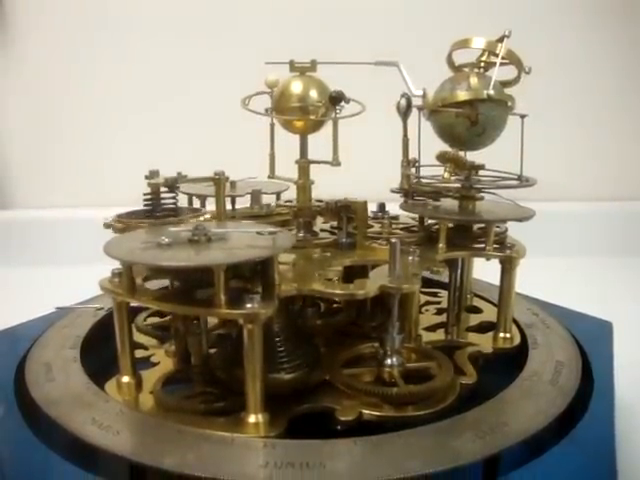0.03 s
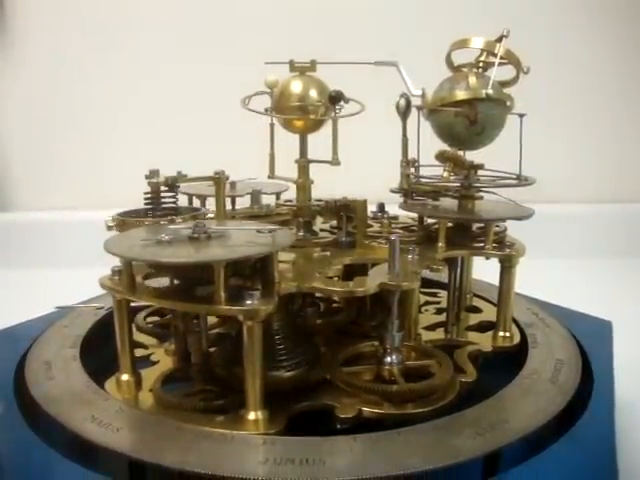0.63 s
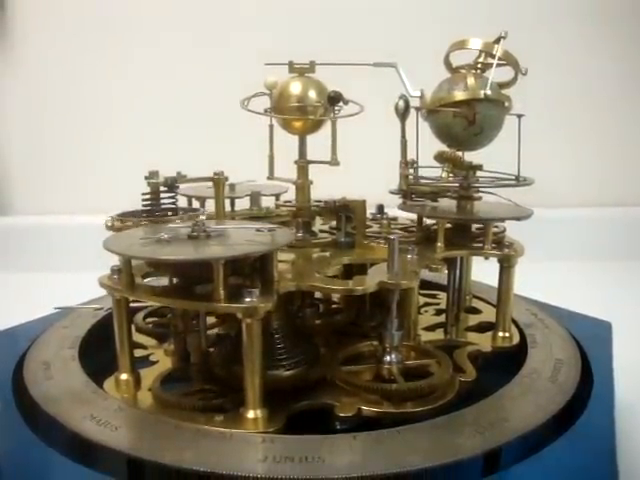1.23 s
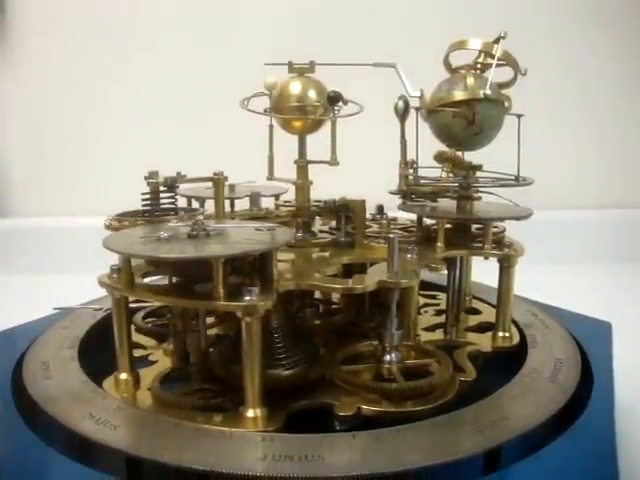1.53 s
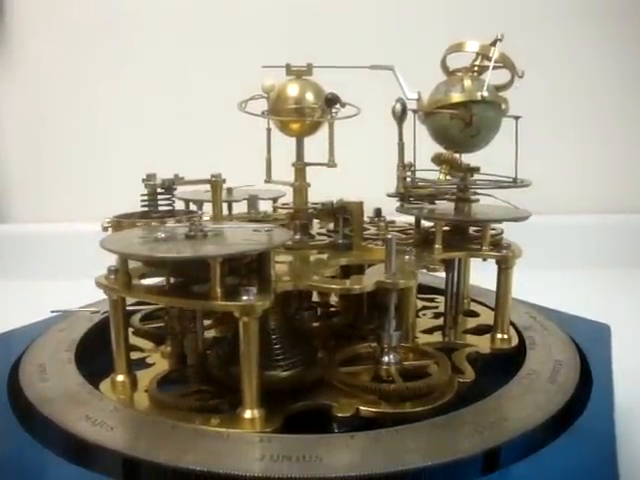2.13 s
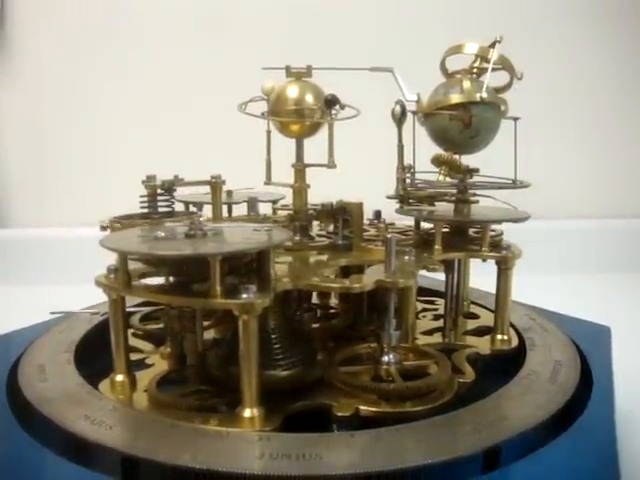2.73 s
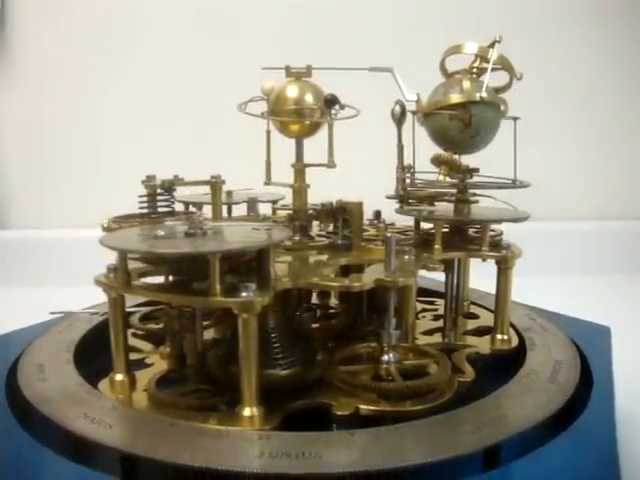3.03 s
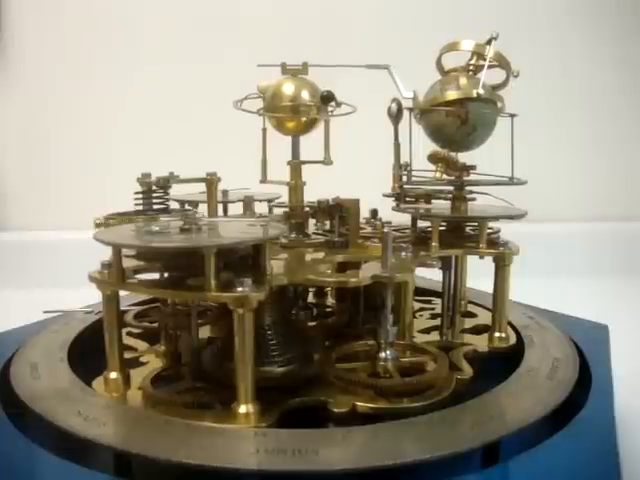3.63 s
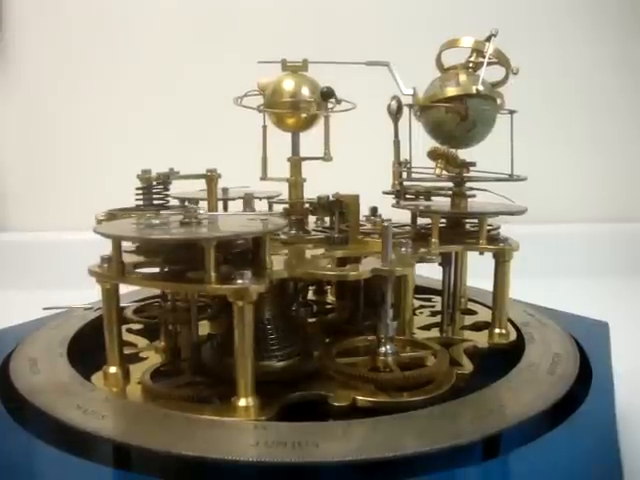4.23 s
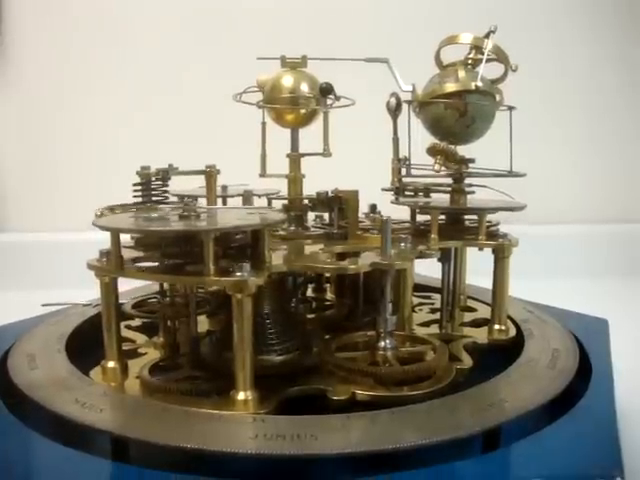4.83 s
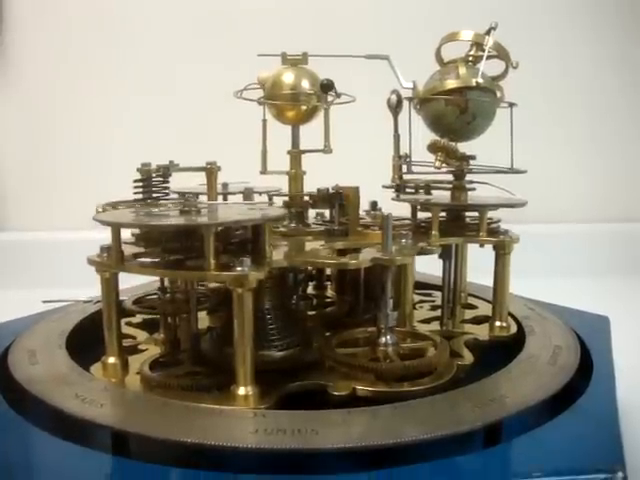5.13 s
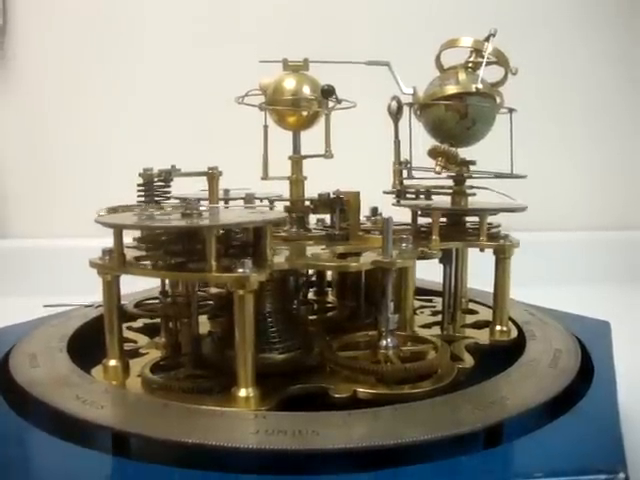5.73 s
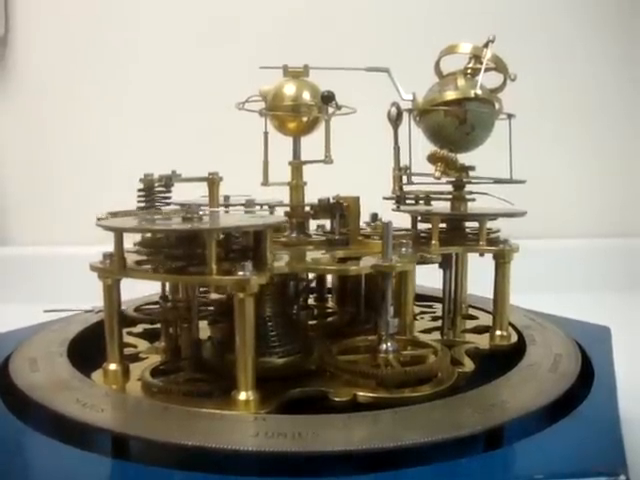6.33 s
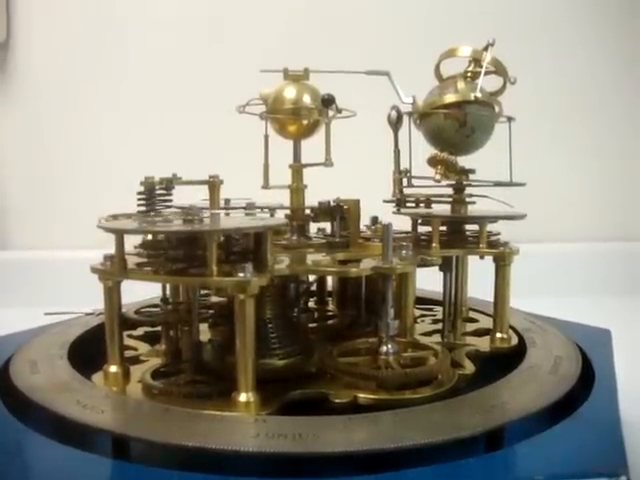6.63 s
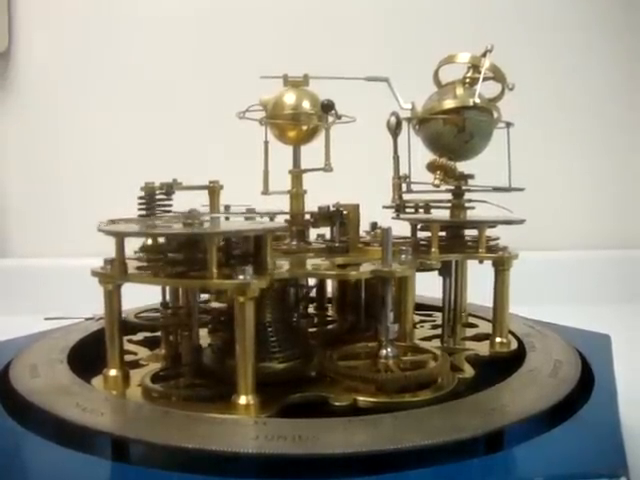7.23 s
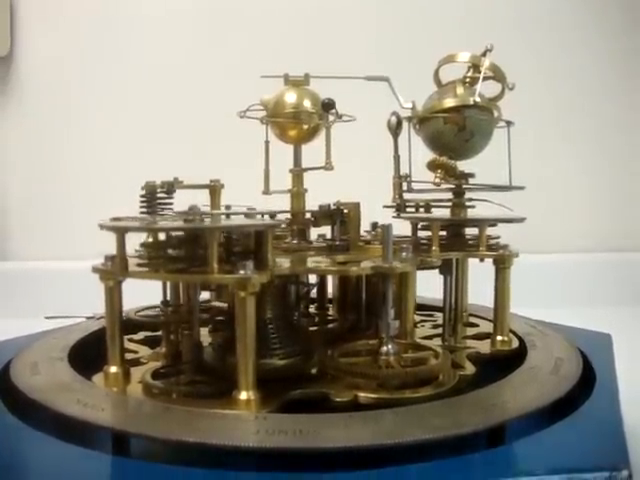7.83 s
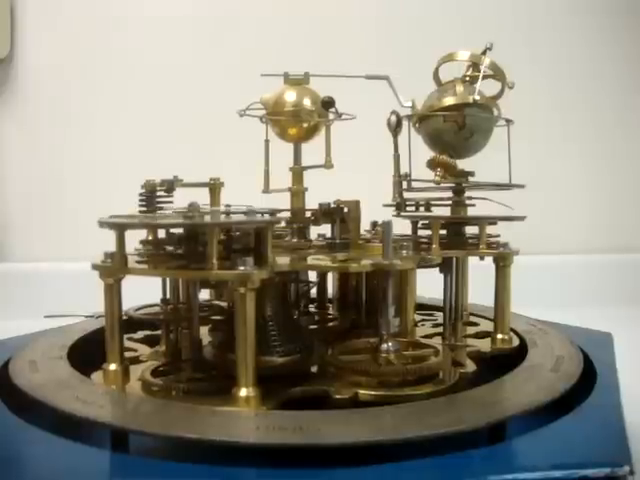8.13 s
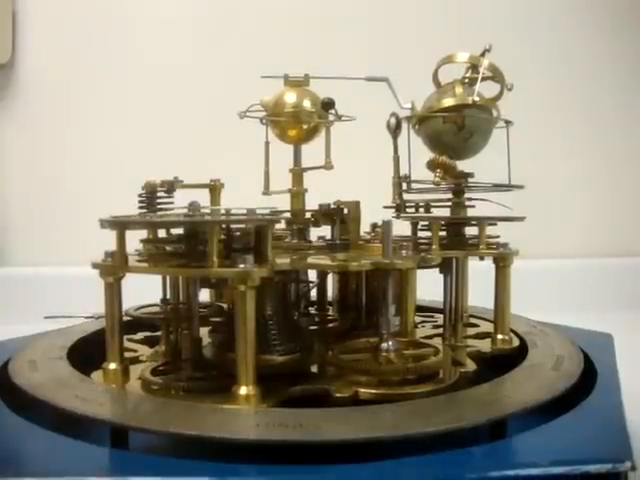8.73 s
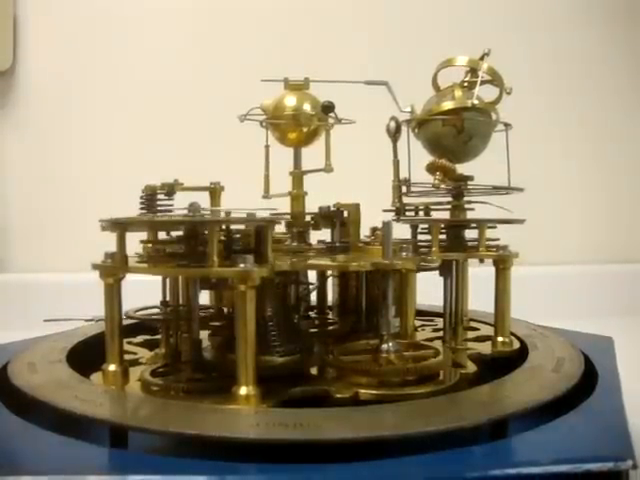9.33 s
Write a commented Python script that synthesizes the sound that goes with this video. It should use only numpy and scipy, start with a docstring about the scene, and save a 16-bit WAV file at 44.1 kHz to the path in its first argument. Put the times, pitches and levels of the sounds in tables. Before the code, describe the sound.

A brass clockwork model of the planets runs on a table in a quiet room, heard from close by. About every two seconds the escapement gives a bright metallic tick, followed at once by a tiny rattle of gear wheels, like a double click. This happens five times, with a few faint gear clicks in between. Soft hiss and low electrical hum continue throughout, and a soft, low bump comes near the end.

```python
"""A brass clockwork orrery runs on a table in a quiet room, heard from close by.
From the start there is soft hiss, mains hum and a faint rustle. At 0.87 s, and about every 1.8 s after,
the escapement lets go and its lever rings with a bright tick. Some 0.12 s after each tick the wheel
train lands in three quick knocks, the last shaking the frame. Between beats, gear teeth settle with
faint clicks. Near 9 s a soft bump excites the low modes of the table."""
import sys
import numpy as np
from scipy import signal
from scipy.fft import rfft, irfft
from scipy.io import wavfile

SR = 44100
rng = np.random.default_rng(int(sys.argv[2]) if len(sys.argv) > 2 else 0)


def master(y):
    """Save y as 16-bit WAV."""
    cut = np.clip(np.atleast_2d(y).T, -1, 1)
    pcm = np.round(cut * 32767)  # scale
    wavfile.write(sys.argv[1], SR, pcm.astype(np.int16))


N = 422478


def gain_of(db):
    """The decibel law: 20 dB is a factor of ten in amplitude."""
    return 10 ** (np.asarray(db) / 20)


def unit_rms(x):
    """Normalisation to an rms of one."""
    return x / np.sqrt(np.mean(x ** 2) + 1e-20)


def value_at(points, hz):
    """Interpolation along a log-frequency axis."""
    f, value = np.transpose(points)
    return np.interp(np.log(hz + 1), np.log(f + 1), value)


def add(mix, start, sound):
    """Superposition of a sound from its start time in seconds."""
    part = mix[round(start * SR):][:len(sound)]
    part += sound[:len(part)]


def coloured(x, spectrum):
    """Filtering as multiplication in the frequency domain."""
    hz = np.fft.rfftfreq(len(x), 1 / SR)
    return irfft(rfft(x) * gain_of(value_at(spectrum, hz)), len(x))


def noise(size, spectrum):
    """Spectral shaping of white noise, at unit rms."""
    return unit_rms(coloured(rng.standard_normal(size), spectrum))


def decay(t, t60, hold=0):
    """Exponential decay: after the hold, 60 dB in every t60."""
    return np.exp(-np.log(1000) * np.maximum(t - hold, 0) / t60)


def damped(x, t60s, hold=0):
    """Frequency-dependent damping: each band decays at its own rate."""
    hz, t, bands = signal.stft(x, SR, nperseg=128)
    fade = decay(t, value_at(t60s, hz)[:, None], hold)
    return signal.istft(bands * fade, SR, nperseg=128)[1][:len(x)]


def drift(rate_hz, size=1024):
    """Low-passed noise: a slow random fluctuation of unit rms."""
    hz = np.fft.rfftfreq(size, N / SR / size)
    spectrum = rfft(rng.standard_normal(size)) * np.exp(-(hz / rate_hz) ** 2)
    slow = unit_rms(irfft(spectrum, size))
    return np.interp(np.arange(N), np.linspace(0, N, size), slow)


# Reverberation time of the room: f/Hz, T60/s
ROOM_T60 = [(300, 0.84), (1300, 0.43), (3000, 0.23), (6000, 0.8), (10000, 0.26)]
# Spectrum of the reverberation: f/Hz, gain/dB
ROOM_COLOUR = [(300, 12), (1300, 0.5), (3000, 4), (6000, -6.5), (9500, -8.5)]
def in_room(x, wet_db, build_up_s=0.011):
    """Reverberation: convolution with a diffuse tail, added to the direct sound."""
    t = np.arange(SR // 2) / SR
    tail = damped(rng.standard_normal(len(t)), ROOM_T60) * np.minimum(t / build_up_s, 1) ** 2
    response = coloured(tail / np.linalg.norm(tail), ROOM_COLOUR)
    return x + gain_of(wet_db) * signal.fftconvolve(x, response)[:len(x)]


# Spectrum of room air and microphone hiss: f/Hz, relative density/dB
HISS_SPECTRUM = [(25, -17.5), (50, -13), (70, -9.5), (110, -11.5), (205, 2), (270, -1.5), (500, 3.5),
                 (650, 0.5), (1200, -3), (1800, -7.5), (2400, -6.5), (5000, -11), (8000, -12),
                 (10100, -14.5)]
def hiss(level_db=-56, swell_db=0.7):
    """Broadband noise under slight random amplitude modulation."""
    return gain_of(level_db + swell_db * drift(rate_hz=4.2)) * noise(N, HISS_SPECTRUM)


# Harmonics of the mains: order, rms level/dB
HUM_HARMONICS = [(2, -70.5), (3, -72), (4, -66), (5, -63), (6, -63), (7, -75.5), (8, -61), (9, -65),
                 (12, -77.5), (13, -74), (16, -77.5), (32, -78)]
def mains_hum(mains_hz=60.075, waver_db=0.7, jitter_turns=0.0056, smear_turns=0.035):
    """A harmonic series; quadratic phase smears each cycle's pulse so its low orders arrive last."""
    turns = mains_hz * np.arange(N) / SR + jitter_turns * drift(rate_hz=1.5)
    out = np.zeros(N)
    for order, db in HUM_HARMONICS:
        amplitude = np.sqrt(2) * gain_of(db + waver_db * drift(rate_hz=2.3))
        out += amplitude * np.cos(2 * np.pi * (order * turns + smear_turns * order ** 2))
    return out


# Spectrum of the rustle: f/Hz, relative density/dB
RUSTLE_SPECTRUM = [(300, -32), (1200, -7.5), (1750, -0.5), (2400, -17.5), (4000, -15.5), (10000, -33)]
def rustle(level_db=-66, swell_db=1.8):
    """Narrow-band noise swells and sinks under slow random amplitude modulation."""
    return gain_of(level_db + swell_db * drift(rate_hz=0.8)) * noise(N, RUSTLE_SPECTRUM)


# Modes of the table: f/Hz, relative level/dB, T60/s
TABLE_MODES = [(135, -3.5, .2), (166, -6, .15), (204, 2.5, 0.13)]
def table_bump(start_s=8.985, level_db=-46, rise_s=0.0066):
    """Free vibration: after a soft push the table's low modes ring as damped sinusoids."""
    out = np.zeros(N)
    t = np.arange(SR // 2) / SR
    thud = sum(gain_of(db) * np.sin(2 * np.pi * hz * t) * decay(t, t60) for hz, db, t60 in TABLE_MODES)
    add(out, start_s, gain_of(level_db) * thud * np.minimum(t / rise_s, 1))
    return out


# Clicks of the gear teeth: t/s, level/dB, centre f/Hz
TOOTH_CLICKS = [(0.3156, -52, 7000), (2.1198, -51.5, 6500), (2.997, -50, 2660), (3.9305, -49, 6800),
                (7.548, -51, 6300), (7.9396, -45, 2140), (8.9950, -50, 1800)]
def settling_teeth(skirt_db=-20, t60=0.035):
    """Transients of settling gear teeth: each is a band of noise in exponential decay."""
    out = np.zeros(N)
    t = np.arange(SR // 2) / SR
    for start, db, hz in TOOTH_CLICKS:
        band = [(hz / 10, 2 * skirt_db), (hz / 2, skirt_db), (hz, 0),
                (hz * 2, skirt_db), (hz * 10, 2 * skirt_db)]
        click = noise(len(t), band) * decay(t, t60)
        add(out, start, gain_of(db) * in_room(click, wet_db=-11.5))
    return out


# Decay of clatter (a crowd of weak, close modes), before ring_scale: f/Hz, T60/s
CLATTER_T60 = [(500, 0.2), (1400, 0.14), (3000, 0.12), (6000, 0.053), (10000, 0.05)]
def impact(modes, clatter_spectrum, clatter_db, treble_db, rise_s, chatter_s, ring_scale):
    """Modal response of struck metal: sustained while the parts chatter, then in free decay."""
    t = np.arange(SR // 2) / SR
    hz, db, t60 = np.transpose(modes)[:, :, None]
    db = db + 1.5 * rng.standard_normal(hz.shape)  # no two teeth meet alike
    hz = hz * (1 + 0.0014 * rng.standard_normal(hz.shape))
    build = 1 - np.exp(-(hz * t / 7) ** 2)  # about 7 cycles: heavy parts answer later than small ones
    envelopes = gain_of(db) * build * decay(t, t60 * ring_scale, chatter_s)
    ring = (envelopes * np.sin(2 * np.pi * (hz * t + rng.random(hz.shape)))).sum(0)
    clatter_t60 = [(f, seconds * ring_scale) for f, seconds in CLATTER_T60]
    clatter = damped(noise(len(t), clatter_spectrum), clatter_t60, chatter_s)
    blow = np.sqrt(2) * ring + gain_of(clatter_db) * clatter
    lows = signal.sosfiltfilt(signal.butter(2, 4200, fs=SR, output="sos"), blow)
    body = lows * (1 - np.exp(-t / 0.0055))
    treble = gain_of(treble_db) * (blow - lows)
    attack = np.sin(np.pi / 2 * np.minimum(t / rise_s, 1)) ** 2
    return (body + treble) * attack


# Modes of the wheels and of the frame's plates and pillars: f/Hz, relative level/dB, unscaled T60/s
WHEEL_MODES = [(1432, -4, .095), (1485, -12, .08), (1540, -15, .12), (1787, -18, .05), (2440, -15, .07),
               (2738, -12, .07), (3022, -12, .06), (3220, -10, .08), (3294, -13, .05), (3572, -14, .07),
               (6940, -14, .03), (7850, -10, .025), (7915, -8, .03), (8570, -13, .025), (9405, -13, .04)]
FRAME_MODES = [(1096, -16, .27), (1125, -18, .25), (1330, -13, .09), (1376, -13, .09), (1515, -14, .12),
               (2285, -14, .08), (2533, -13, .09), (2734, -10, .1), (2948, -14, .13)]
# Clatter spectra of the same parts: f/Hz, relative density/dB
WHEEL_CLATTER = [(200, -29), (1100, -1), (1450, -3), (2000, 1.5), (2400, 5.5), (3400, 10), (4000, -6.5),
                 (6000, -4.5), (7000, -8), (7900, 3), (8900, -6), (9450, -17), (10100, -11.5)]
FRAME_CLATTER = [(200, -33), (800, -11.5), (1150, 0.5), (1400, -3.5), (1900, 0), (2400, 5), (3400, 2),
                 (4000, -2.5), (5400, 2), (6500, -2), (8000, -5), (9450, 2), (10100, -19.5)]
# Knocks within a beat: delay/s, relative level/dB, treble/dB, rise/s, chatter/s, frame coupling/dB
KNOCKS = [(0, .4, 2, .0018, .0056, -16), (.022, -1.6, -1.8, .0032, .0072, -16),
          (.0466, -1.8, -2, .0048, .0108, .3)]
# Beats of the clockwork: tick t/s, level/dB, treble/dB, ring scale; first knock t/s, knocks' level/dB
BEATS = [(0.869, -28.7, 1, .74, 1.0017, -33.5), (2.69, -29, 3, .77, 2.8156, -32),
         (4.5088, -27.6, -.3, .92, 4.6285, -33), (6.3235, -27.4, -2, 1.08, 6.4421, -32.2),
         (8.1388, -27, -2.6, .9, 8.2545, -33.2)]
def wheel_train():
    """Backlash: the freed wheels take up their play, rebound and stop, passing the blow to the frame."""
    out = np.zeros(N)
    for *_, start, beat_db in BEATS:
        for delay, db, treble_db, rise_s, chatter_s, coupling_db in KNOCKS:
            contact = dict(treble_db=treble_db, rise_s=rise_s, chatter_s=chatter_s)
            wheels = impact(WHEEL_MODES, WHEEL_CLATTER, clatter_db=-5, ring_scale=0.68, **contact)
            frame = impact(FRAME_MODES, FRAME_CLATTER, clatter_db=2, ring_scale=0.64, **contact)
            knock = wheels + gain_of(coupling_db) * frame
            add(out, start + delay, gain_of(beat_db + db) * in_room(knock, wet_db=-10))
    return out


# Modes of the escapement lever: f/Hz, relative level/dB, unscaled T60/s
LEVER_MODES = [(963, -20, .15), (1211, -18, .12), (1330, -13, .12), (1469, -15, .11), (2594, -17, .08),
               (2680, -15, .08), (3235, -16, .08), (4338, -12, .075), (5566, -15, .05), (6088, -12, .05),
               (8350, -17, .04), (9390, -11, .065), (9430, -12, .06)]
# Clatter spectrum of the lever: f/Hz, relative density/dB
LEVER_CLATTER = [(200, -27), (750, -7.5), (1200, -0.5), (1900, 0.5), (2700, 1.5), (5000, 1), (6200, 3),
                 (6900, 4.5), (7400, -3), (8600, -3.5), (9000, -3), (9500, 10), (10100, -16)]
def escapement():
    """Impulsive excitation: once a beat the lever snaps off a tooth and rings in its modes."""
    out = np.zeros(N)
    for start, db, treble_db, ring_scale, _, _ in BEATS:
        tick = impact(LEVER_MODES, LEVER_CLATTER, clatter_db=-1, treble_db=treble_db,
                      rise_s=0.0026, chatter_s=0.0034, ring_scale=ring_scale)
        add(out, start, gain_of(db) * in_room(tick, wet_db=-11))
    return out


def scene():
    """Linear superposition of clockwork and background in one channel."""
    clockwork = escapement() + wheel_train() + settling_teeth()
    return (clockwork + table_bump() + rustle() + mains_hum() + hiss())[None]


def record(dry):
    """Band limiting: a windowed-sinc low-pass at 10.1 kHz."""
    low_pass = signal.firwin(301, 10100, window=("kaiser", 3), fs=SR)
    return signal.oaconvolve(dry, low_pass[None], "same")


dry = scene()
out = record(dry)
master(out)
```